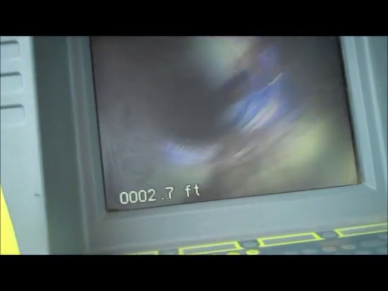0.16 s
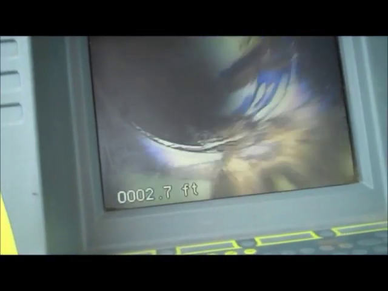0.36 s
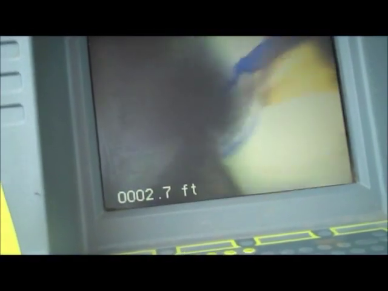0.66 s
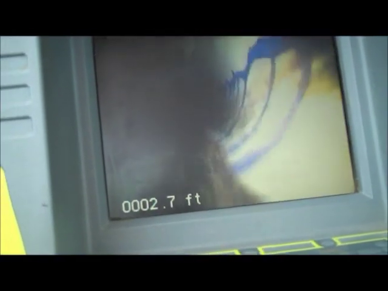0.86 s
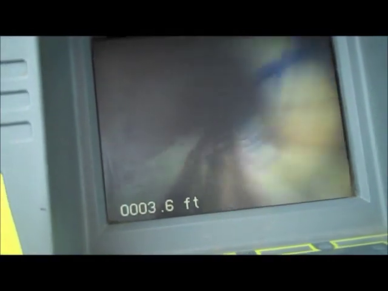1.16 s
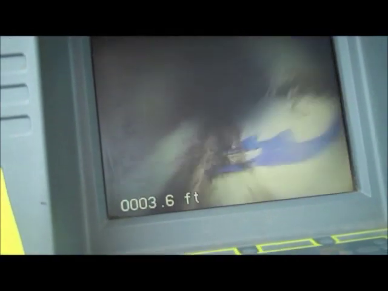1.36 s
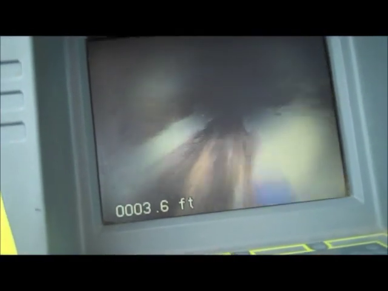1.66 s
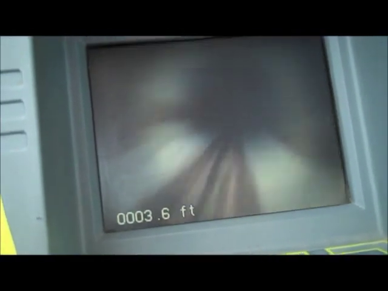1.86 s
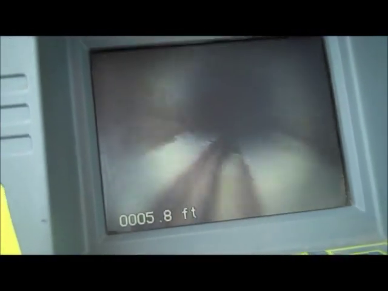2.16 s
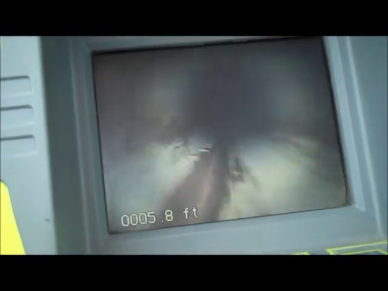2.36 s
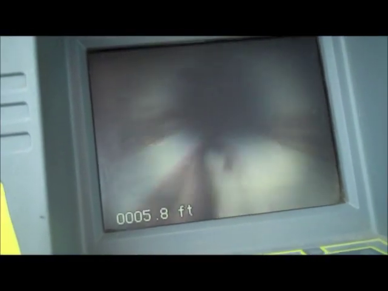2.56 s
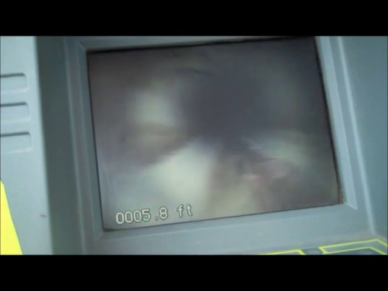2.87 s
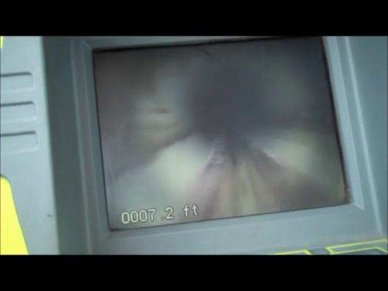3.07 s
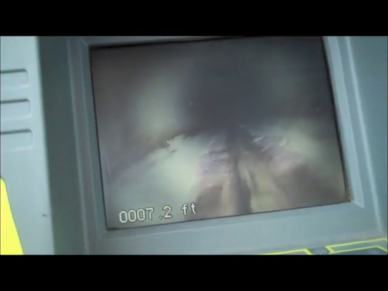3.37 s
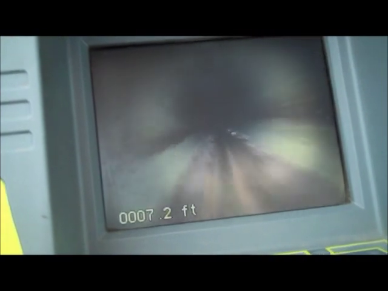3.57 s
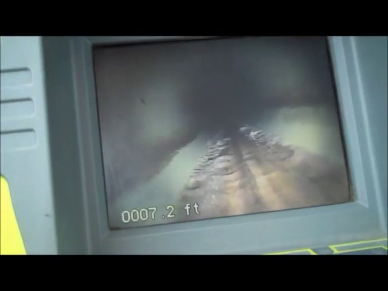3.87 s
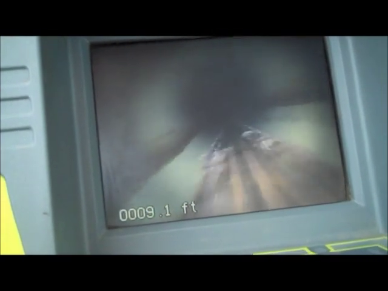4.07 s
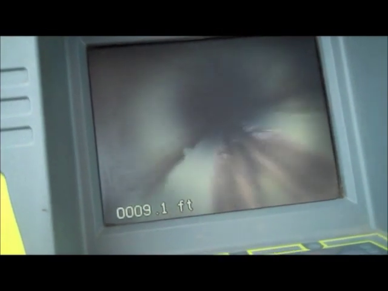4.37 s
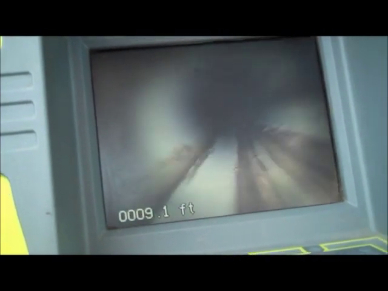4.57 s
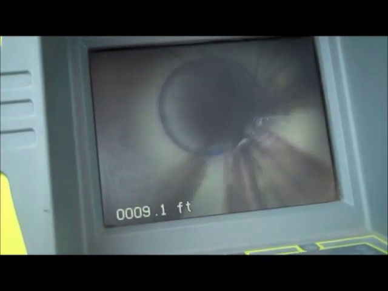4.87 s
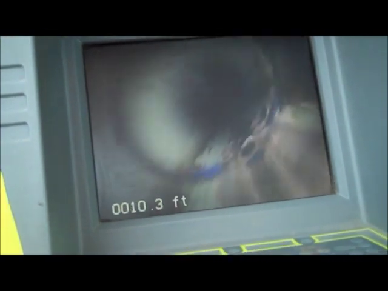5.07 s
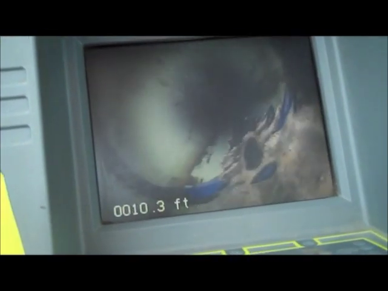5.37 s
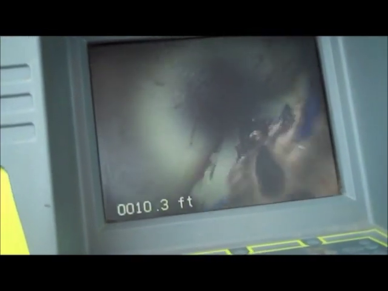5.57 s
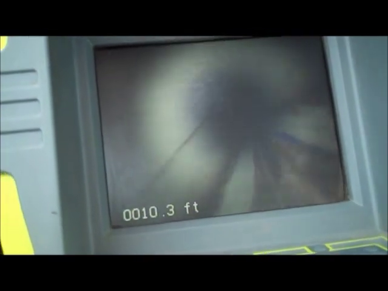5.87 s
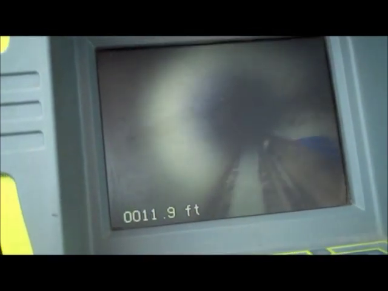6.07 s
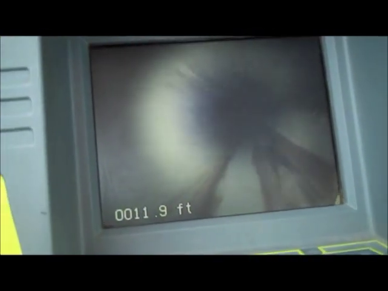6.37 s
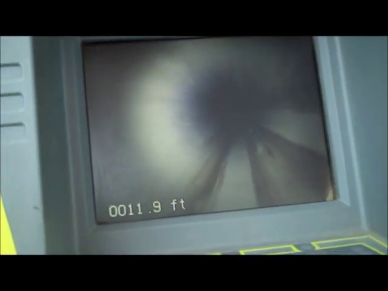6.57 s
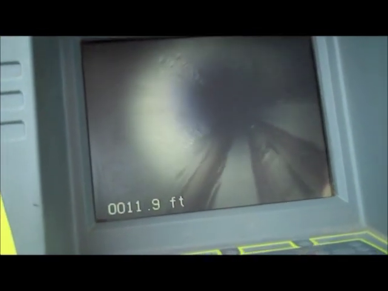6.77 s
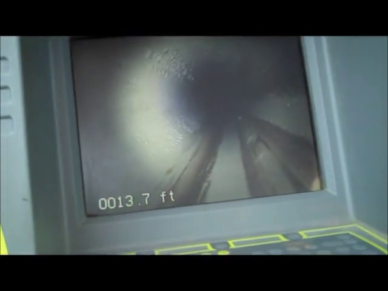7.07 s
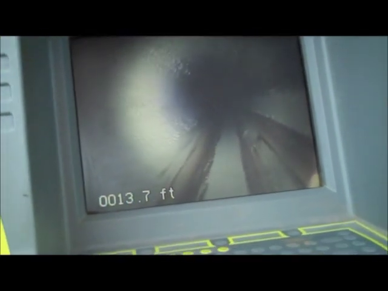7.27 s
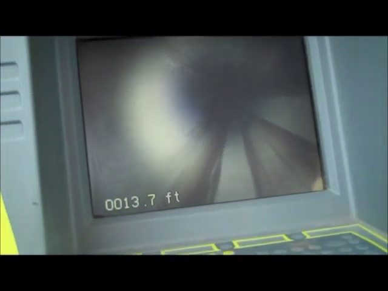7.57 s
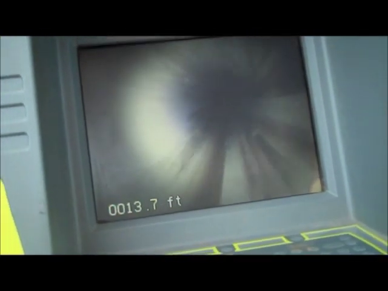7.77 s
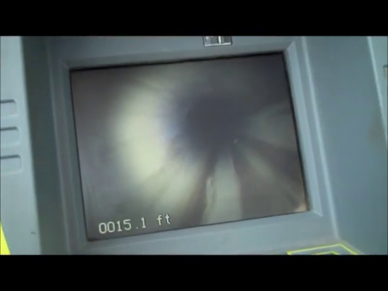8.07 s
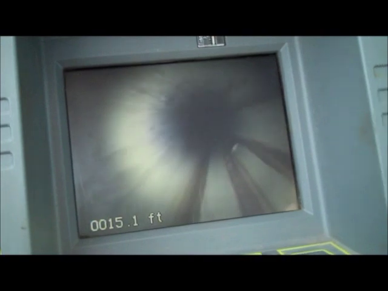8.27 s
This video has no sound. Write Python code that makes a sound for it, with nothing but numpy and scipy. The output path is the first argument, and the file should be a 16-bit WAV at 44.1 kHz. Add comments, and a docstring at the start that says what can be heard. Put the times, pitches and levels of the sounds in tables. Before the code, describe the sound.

Outdoors and close by, a push rod slides off its reel and scrapes along a plastic pipe in irregular shoves with short pauses. It clicks and knocks against the frame and pipe, hardest near the start, later in quick rattling clusters. Brief squeaks and a faint metallic ring go with the rubbing. Behind it are a soft low rumble, two short phrases from a distant bird and, finally, a faint high whine.

```python
"""A knock fades; a flexible push rod rubs in strokes, pulled by hand from its reel into a plastic drain pipe.
Friction makes the reel's steel frame sing faintly; the rod clicks and knocks against frame and pipe.
Outdoors, over a low rumble and hum, a small bird whistles some way off. Brief squeaks come with the
strokes; a thin whine swells at the end. Each microphone port rings at its own treble pitch."""
import sys
import numpy as np
from scipy import signal
from scipy.fft import rfft, irfft, next_fast_len
from scipy.io import wavfile
from scipy.ndimage import uniform_filter1d

SR = 44100
rng = np.random.default_rng(int(sys.argv[2]) if len(sys.argv) > 2 else 0)


def transcribe(signal):
    """Save signal, clipped to [-1, 1], as a 16-bit WAV file at the path in sys.argv[1]."""
    frames = np.atleast_2d(signal).T
    limited = np.clip(frames, -1, 1)
    pcm = np.round(limited * 32767).astype(np.int16)
    wavfile.write(sys.argv[1], SR, pcm)


N = 370881
TIME_S = np.arange(N) / SR

# Table levels are relative: layer gains follow.
# sound field: (frequency [Hz], left-right correlation [1])
CORRELATION = [(25, .05), (70, 0.72), (300, 0.92), (1200, 0.64), (2500, 0.51), (5000, 0.1), (13000, 0.076)]
# hand pushes; the first row is the fading tail of a knock:
# (start [s], length [s], guide rub [dB], pipe scrape [dB], frame ring [dB])
SWELLS = [(-0.04, 0.035, -29.5, -28.5, -47), (0.06, 0.073, -61, -54, -59), (0.18, 0.25, -72, -67, -51),
          (0.381, 0.12, -57, -42.5, -54.5), (0.72, 0.16, -49, -62, -59), (1.053, 0.38, -52, -49, -65),
          (1.47, .24, -48, -49, -56), (1.82, .14, -46, -50.5, -61), (2.134, 0.21, -36.5, -43.5, -60),
          (2.396, 0.16, -40, -43, -61), (2.8, 0.098, -40.5, -45, -61), (2.87, 0.096, -31, -42, -60),
          (2.942, 0.096, -41.5, -42.5, -52), (3.126, .1, -43, -47.5, -63), (3.28, 0.045, -42.5, -50, -57),
          (3.461, 0.083, -38.5, -42, -54), (3.547, 0.16, -50, -46, -54.5), (3.757, 0.17, -43, -63, -71),
          (3.91, 0.16, -44, -46.5, -55.5), (4.074, 0.17, -47.5, -61, -61), (4.47, 0.15, -51, -63, -57.5),
          (4.603, .16, -42.5, -47, -58), (4.9, 0.09, -44.5, -52.5, -69), (5.15, 0.12, -50.5, -52, -59),
          (5.31, .12, -42.5, -54, -68.5), (5.55, 0.16, -47, -46.5, -66), (5.672, 0.17, -44, -46, -61),
          (5.87, 0.69, -52, -46.5, -64), (6.227, 0.14, -43.5, -39.5, -51), (6.29, 0.22, -33.5, -41, -59),
          (6.564, 0.079, -48.5, -47, -62), (6.76, .09, -44.5, -44, -58), (6.845, .07, -38, -45, -66),
          (6.956, 0.084, -43.5, -56, -61), (7.164, .24, -57, -49.5, -69), (7.904, 0.13, -61, -49, -56.5),
          (8.24, .08, -47.5, -53, -62)]
# rod stands for a new grip: (start [s], end [s])
RESTS = [(0.52, 0.78), (2.59, 2.67), (3.72, 3.79), (4.78, 4.91), (7.56, 7.77), (8.16, 8.25)]
# guide rub, pipe scrape, sizzle of hard pushes: (frequency [Hz], density [dB])
RUB_SPECTRUM = [(1000, -23), (2500, 1.5), (4000, 1), (5500, -2), (7200, -3), (9500, -1.5), (14000, -5.5)]
SCRAPE_SPECTRUM = [(150, -14), (400, -4.5), (600, -7), (1000, -1.5), (1700, 0), (2700, -2), (4500, -12),
                   (9000, -39)]
SIZZLE_SPECTRUM = [(3000, -20), (6500, -14), (8500, 1), (14000, 0)]
# scraped pipe wall, reel frame: (frequency [Hz], width [Hz], gain [dB])
WALL_MODES = [(440, 22, 6.5), (1400, 62, -7.5), (1870, 170, -11), (2400, 95, -3.5)]
FRAME_MODES = [(1444, 83, -9), (1930, 23, 6.5), (3060, 54, -7.5), (3945, 40, -2.5), (5190, 17, -5),
               (5750, 45, -12), (7880, 100, -12)]
# outdoor rumble: (frequency [Hz], density [dB])
RUMBLE_SPECTRUM = [(20, -6.5), (40, -6), (62, 5), (100, -4), (200, -3.5), (400, -8), (600, -11),
                   (1200, -10.5), (3000, -15), (7000, -27), (14000, -25)]
# distant hum: (frequency [Hz], level [dB])
HUM_TONES = [(60, -87), (155.5, -65.5), (229, -68)]
# rod strikes: (time [s], crack [dB], knock re crack [dB], thump re crack [dB], base t60 [s])
STRIKES = [(0.145, -37.5, -4, -9, 0.049), (0.462, -23.5, -5, -12, 0.049), (0.4668, -1, -13.5, -20, 0.032),
           (1.409, -37, -15, -22, 0.099), (1.425, -43, -21, -15, 0.05), (1.514, -33.5, -19, -32, 0.045),
           (1.598, -56, 17, 5, 0.042), (2.015, -43.5, -13, -17, 0.08), (2.131, -39, 2.5, -6, 0.088),
           (2.159, -41, -3, -11, 0.05), (2.293, -44, -17, -20, 0.05), (2.479, -38, 3, -15, 0.036),
           (2.533, -46.5, 15, 1, 0.035), (2.795, -33, -11, -19, 0.054), (2.8063, -25.5, -13.5, -20, 0.05),
           (2.889, -30, -13.5, -37, 0.05), (2.896, -27.5, -29, -27, 0.04), (2.919, -29, -14, -26, 0.047),
           (2.942, -38, -13, -16, 0.046), (2.961, -34.5, 0.5, 2.5, 0.026), (3.9879, -24.5, -8, -35, 0.038),
           (4.531, -55, 10.5, 8.5, 0.038), (4.654, -48, 6, -2, 0.037), (4.6985, -19, -3.5, -20, 0.05),
           (5.13, -45, -1, -26, 0.08), (5.5466, -31.5, -0.5, -13.5, 0.062), (6.2331, -34, -2, -12, 0.029),
           (6.3932, -24, -21, -36, 0.035), (6.4335, -20, -13, -24, 0.068), (6.459, -34, -9, -14, 0.14),
           (6.475, -30.5, -2.5, -4.5, 0.099), (6.801, -51, 16.5, 5.5, 0.044), (7.17, -34.5, -4, -18, 0.046),
           (7.445, -39, -24, -11, 0.031)]
# struck rod and pipe, low pipe modes: (frequency [Hz], width [Hz], gain [dB])
HOLLOW_MODES = [(383, 280, -0.5), (828, 82, 9.5), (1400, 320, -9.5), (1830, 370, 3), (2464, 170, 5.5),
                (3450, 1240, -1.5)]
BOOM_MODES = [(338, 89, 1), (430, 22, 10)]
# bird phrases: (start [s], level [dB], rising whistles [count], falling whistles [count])
PHRASES = [(.645, -50, 3, 3), (3.872, -50.5, 3, 1)]
# rising, flat and falling whistle: (position in note [0-1], pitch ratio [1], level [dB])
RISE_SHAPE = [(0, .69, -18), (.14, .745, 1), (.26, .78, 1), (.38, .88, -6), (.55, 1.03, 2), (.78, 1.09, -5),
              (1, 1.13, -12)]
PIP_SHAPE = [(0, .97, -15), (.3, 1, 0), (.65, 1, -1), (1, 1.01, -15)]
FALL_SHAPE = [(0, 1.19, -5), (.15, 1.08, 0), (.38, 1.01, 1), (.6, .995, 0), (.85, 1.015, -4),
              (1, 1.025, -14)]
# squeaks: (centre time [s], length [s], pitch [Hz], peak [dB])
SQUEAKS = [(1.053, 0.015, 1810, -45.5), (1.17, .022, 2660, -51), (1.193, 0.023, 2100, -45),
           (1.23, 0.018, 2560, -45.5), (1.293, .026, 2400, -43.5), (1.336, 0.016, 1490, -45),
           (1.393, 0.035, 1195, -50), (1.708, .08, 1400, -49.5), (3.962, 0.035, 1450, -46)]
# thin whine: (time [s], level [dB])
WHINE_LEVELS = [(7.3, -89), (7.75, -69), (8.41, -64)]
# microphone ports, left then right: (resonance [Hz], Q [1], gain [dB])
PORTS = [(7310, 9.3, 3), (5970, 6.16, 1.83)]


def from_db(db):
    """Decibels to gain."""
    return 10 ** (np.asarray(db) / 20)


def unit_rms(x):
    """Scale to rms 1."""
    return x / np.sqrt(np.mean(x ** 2) + 1e-20)


def at_hz(table, hz):
    """Interpolate a table over log frequency."""
    knots_hz, values = np.transpose(table)
    return np.interp(np.log(hz + 1), np.log(knots_hz), values)


def band(x, low_hz, high_hz, order=2):
    """Causal band-pass."""
    sos = signal.butter(order, [low_hz, high_hz], "band", fs=SR, output="sos")
    return signal.sosfilt(sos, x + 1e-18)


def pole_pair(hz, width_hz):
    """Denominator of a damped resonator."""
    r = np.exp(-np.pi * width_hz / SR)
    return np.array([1, -2 * r * np.cos(2 * np.pi * hz / SR), r * r])


def resonate(x, hz, width_hz):
    """One resonance, peak gain 1."""
    poles = pole_pair(hz, width_hz)
    return signal.lfilter(np.array([1, 0, -1]) * (1 - poles[2]) / 2, poles, x + 1e-18)


def ringing(x, modes):
    """A body's modes in parallel."""
    return sum(from_db(db) * resonate(x, hz, width_hz) for hz, width_hz, db in modes)


def drift(rate_hz):
    """Random wander, rms 1."""
    knots = rng.standard_normal(N // 20)
    return unit_rms(np.interp(TIME_S * rate_hz, np.arange(len(knots)), knots))


def stereo_noise(spectrum=None):
    """Noise alike on both sides in the low mids, diffuse in the treble; white by default."""
    size = next_fast_len(N)
    hz = np.arange(size // 2 + 1) * SR / size
    mid, side = rfft(rng.standard_normal((2, size)))
    alike = at_hz(CORRELATION, hz)
    pair = np.sqrt(1 + alike) * mid + np.sqrt(1 - alike) * side * [[1], [-1]]
    colour = from_db(at_hz(spectrum, hz)) if spectrum else 1
    return unit_rms(irfft(pair * colour, size)[:, :N])


def rod_motion(attack_s=0.036, sag_db_per_s=22, release_s=0.023, rest_db=-17, brake_s=0.02):
    """Rub, scrape and frame levels [dB]: a knock's tail, then pushes, over coasting that drops at rests."""
    standing = sum((TIME_S > start_s) & (TIME_S < end_s) for start_s, end_s in RESTS).astype(float)
    braking_db = rest_db * uniform_filter1d(standing, round(brake_s * SR))
    coast_db = np.array([[-52.5], [-54.5], [-64]])
    power = from_db(coast_db + braking_db) ** 2
    for start_s, length_s, *levels_db in SWELLS:
        span = slice(max(0, round(start_s * SR)), round((start_s + 1) * SR))
        t = TIME_S[span] - start_s
        attack = np.clip(t / attack_s, 0, 1)
        release = np.exp(-np.maximum(t - length_s, 0) / release_s)
        swell = attack * from_db(-sag_db_per_s * t) * release
        power[:, span] += np.outer(from_db(levels_db), swell) ** 2
    return 10 * np.log10(power)


def friction(spectrum, slips_per_s, slip_db, judder_db, judder_hz=45):
    """Sliding contact: tiny uneven slips under a juddering grip."""
    noise = stereo_noise(spectrum)
    return unit_rms(noise * from_db(slip_db * drift(slips_per_s) + judder_db * drift(judder_hz)))


def follow_rub(rub_db, typical_gain_db, db_per_db, typical_rub_db=-49.5):
    """Gain that tracks the rub level."""
    return from_db(typical_gain_db + db_per_db * (rub_db - typical_rub_db))


def guide_rub(rub_db, gain_db=-8.5):
    """The rod slides brightly through its guide; hard pushes sizzle."""
    rub = friction(RUB_SPECTRUM, slips_per_s=810, slip_db=2, judder_db=1)
    sizzle = follow_rub(rub_db, typical_gain_db=-70.5, db_per_db=1.12) * stereo_noise(SIZZLE_SPECTRUM)
    return from_db(rub_db + gain_db) * rub + sizzle


def pipe_scrape(scrape_db, gain_db=-2.5, modes_db=-2):
    """The rod scrapes dully along the pipe, coloured by the wall's modes."""
    scrape = friction(SCRAPE_SPECTRUM, slips_per_s=300, slip_db=2.5, judder_db=2.43)
    wall = from_db(modes_db) * ringing(scrape, WALL_MODES)
    return from_db(scrape_db + gain_db) * unit_rms(scrape + wall)


def grit_ticks(scrape_db, gain_db=12, ticks_per_s=12, spread_db=3, decay_s=0.0019):
    """Grit catches under the rod: sparse ticks at random pitches."""
    pitches_hz = np.geomspace(1200, 7500, num=12)
    catches = rng.random(N) < ticks_per_s / SR
    kicks = catches * from_db(spread_db * np.minimum(rng.exponential(1, N), 2))
    pitch_index = rng.integers(0, len(pitches_hz), N)
    fade = np.exp(-1 / (decay_s * SR))
    grit, ticks = rng.standard_normal(N), 0
    for k, hz in enumerate(pitches_hz):
        envelope = signal.lfilter([1], [1, -fade], kicks * (pitch_index == k) + 1e-18)
        ticks += resonate(grit * envelope, hz, width_hz=500) * pitches_hz[0] / hz
    return from_db(scrape_db + gain_db) * ticks


def frame_singing(rub_db, frame_db, frame_gain_db=2, tone_hz=7186):
    """Friction keeps one high tone and the turning frame ringing, swelling with each push."""
    tone = unit_rms(resonate(stereo_noise(), tone_hz, width_hz=22))
    tone_gain = follow_rub(rub_db, typical_gain_db=-72, db_per_db=0.81)
    frame = unit_rms(ringing(stereo_noise(), FRAME_MODES))
    return tone_gain * tone + from_db(frame_db + frame_gain_db) * frame


def outdoors(rumble_db=-51, waver_rad=0.41):
    """Low rumble and a faint, wavering distant hum."""
    hum = sum(np.sqrt(2) * from_db(db) * np.sin(2 * np.pi * hz * TIME_S + waver_rad * drift(4))
              for hz, db in HUM_TONES)
    return from_db(rumble_db) * stereo_noise(RUMBLE_SPECTRUM) + hum


def clatter(levels_db, rise_s, rebound_db, tail_db, tail_t60_s, t60_scale=1):
    """Per strike: a burst of chatter, a sharp rebound, a tail of scatter from nearby walls."""
    rebound_at_s, rebound_width_s = 0.00269, 0.00033
    power, t = np.zeros(N), np.arange(SR // 2) / SR
    rebound = from_db(rebound_db) * np.exp(-np.abs(t - rebound_at_s) / rebound_width_s)
    tail = from_db(tail_db - 60 * t / tail_t60_s)
    for (time_s, *_, t60_s), db in zip(STRIKES, levels_db):
        chatter = from_db(-60 * t / (t60_s * t60_scale))
        envelope = (chatter + rebound + tail) * (1 - np.exp(-t / rise_s))
        start = round(time_s * SR)
        power[start:start + len(t)] += (from_db(db) * envelope[:N - start]) ** 2
    return np.sqrt(power) * stereo_noise()


def rod_strikes(crack_gain_db=-4, edge_gain_db=-6, knock_gain_db=4, thump_gain_db=13, left_db=0.7):
    """A bright crack whose top edge dies first; a softer knock and thump ring in the hollow pipe."""
    _, level_db, knock_db, thump_db, _ = np.transpose(STRIKES)
    crack = clatter(level_db + crack_gain_db,
                    rise_s=0.00054, rebound_db=-1.7, tail_db=-9.5, tail_t60_s=0.13)
    edge = clatter(level_db + edge_gain_db,
                   rise_s=0.0002, rebound_db=-2, tail_db=-24, tail_t60_s=0.1, t60_scale=0.75)
    knock = clatter(level_db + knock_db + knock_gain_db,
                    rise_s=0.001, rebound_db=1.5, tail_db=-9.5, tail_t60_s=0.11)
    thump = clatter(level_db + thump_db + thump_gain_db,
                    rise_s=0.0026, rebound_db=0, tail_db=-8.5, tail_t60_s=0.052, t60_scale=1.1)
    crack = band(crack, 3300, 8700, order=1)
    bright = band(crack, 200, 9400, order=4) + band(edge, 9500, 15500)
    hollow = band(knock, 1100, 3610, order=3) + band(thump, 45, 575)
    return bright * from_db([[left_db], [-left_db]]) + hollow + ringing(hollow, HOLLOW_MODES)


def pipe_boom(gain_db=30, thump_weight=1.9):
    """Soft, heavy thumps kick the pipe's low modes; hard cracks barely do."""
    kicks = np.zeros(N)
    for time_s, level_db, _, thump_db, _ in STRIKES:
        kicks[round(time_s * SR)] += from_db(level_db + thump_weight * thump_db + gain_db)
    return ringing(kicks, BOOM_MODES)


def bird_notes():
    """Rises, then ever shorter, lower falls, with pips: (start [s], length [s], pitch [Hz], dB, shape)."""
    rise_s, rise_hz, rise_every_s = 0.09, 4400, 0.208
    fall_s, fall_hz, fall_every_s, fall_wait_s = 0.125, 6170, 0.292, 0.145
    fall_shrink, fall_step_hz, fall_db = 0.75, 170, 0.5
    pip_s, pip_db = 0.033, 1
    rise_pip_hz, rise_pip_lag_s, fall_pip_hz, fall_pip_lag_s = 4325, 0.135, 3350, 0.17
    for start_s, db, rises, falls in PHRASES:
        rise_times_s = start_s + rise_every_s * np.arange(rises)
        for at_s in rise_times_s:
            yield at_s, rise_s, rise_hz, db, RISE_SHAPE
        for at_s in rise_times_s[:-1]:
            yield at_s + rise_pip_lag_s, pip_s, rise_pip_hz, db + pip_db, PIP_SHAPE
        for k in range(falls):
            at_s = rise_times_s[-1] + fall_wait_s + k * fall_every_s
            yield at_s, fall_s * fall_shrink ** k, fall_hz - k * fall_step_hz, db + fall_db, FALL_SHAPE
            yield at_s + fall_pip_lag_s, pip_s, fall_pip_hz, db + pip_db, PIP_SHAPE


def bird(gain_db=-6, echo_db=0.5, echo_t60_s=0.2, quaver=0.018):
    """Quavering whistles, smeared by scatter from trees and walls."""
    song, wobble = np.zeros(N), 1 + quaver * drift(350)
    for start_s, length_s, hz, db, shape in bird_notes():
        position, ratio, shape_db = np.transpose(shape)
        along = np.linspace(0, 1, round(length_s * SR))
        start = round(start_s * SR)
        span = slice(start, start + len(along))
        pitch_hz = hz * np.interp(along, position, ratio) * wobble[span]
        envelope = from_db(db + np.interp(along, position, shape_db))
        envelope *= signal.windows.tukey(len(along), 0.1)
        song[span] += envelope * np.sin(2 * np.pi * np.cumsum(pitch_hz) / SR)
    t = np.arange(SR // 2) / SR
    scatter = unit_rms(rng.standard_normal((2, len(t))) * from_db(-60 * t / echo_t60_s))
    echo = signal.fftconvolve(song[None], scatter / np.sqrt(len(t)), axes=1)[:, :N]
    return from_db(gain_db) * (song + from_db(echo_db) * echo)


def squeaks(sag=0.038, rasp=0.065):
    """Brief raspy chirps that sag in pitch."""
    chirps, jitter = np.zeros(N), rasp * drift(500)
    for centre_s, length_s, hz, db in SQUEAKS:
        along = np.linspace(-0.5, 0.5, round(length_s * SR))
        start = round((centre_s - length_s / 2) * SR)
        span = slice(start, start + len(along))
        phase = 2 * np.pi * np.cumsum(hz * (1 - sag * along + jitter[span])) / SR
        chirps[span] += from_db(db) * np.cos(np.pi * along) * np.sin(phase)
    return chirps


def whine(pitch_hz=2990, width_hz=6.5):
    """A thin, narrow-band whine swells at the end."""
    level_db = np.interp(TIME_S, *np.transpose(WHINE_LEVELS))
    return from_db(level_db) * unit_rms(resonate(stereo_noise(), pitch_hz, width_hz))


def scene():
    """Rod and reel close by, slightly left; bird and rumble beyond."""
    rub_db, scrape_db, frame_db = rod_motion()
    sliding = guide_rub(rub_db) + pipe_scrape(scrape_db) + grit_ticks(scrape_db)
    singing = frame_singing(rub_db, frame_db)
    left, right = sliding + singing + rod_strikes() + pipe_boom() + squeaks() + whine()
    near = np.array([left, np.roll(right, 1)])  # right lags one sample
    return near + outdoors() + bird()


def record(dry, peak_hz=12800, peak_width_hz=950, peak_db=1, cutoff_hz=14400):
    """Each port is a resonant low-pass plus a higher peak; the hardest strike overloads; top is cut."""
    peaked = dry + from_db(peak_db) * resonate(dry, peak_hz, peak_width_hz)
    channels = []
    for x, (hz, q, db) in zip(peaked, PORTS):
        poles = pole_pair(hz, hz / q)
        channels.append(from_db(db) * signal.lfilter([poles.sum()], poles, x))
    low_pass = signal.ellip(10, 0.1, 80, cutoff_hz, fs=SR, output="sos")
    return signal.sosfilt(low_pass, np.tanh(channels))


dry = scene()
out = record(dry)
transcribe(out)
```